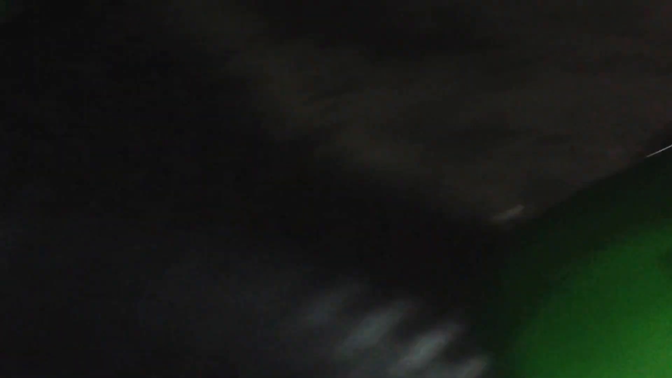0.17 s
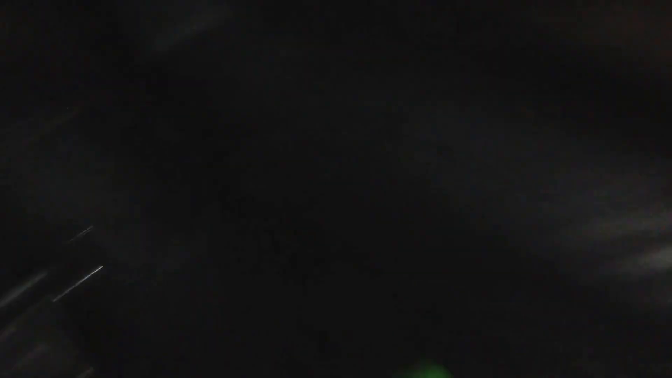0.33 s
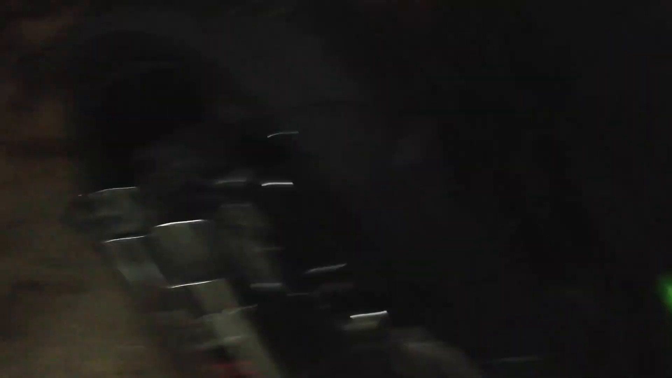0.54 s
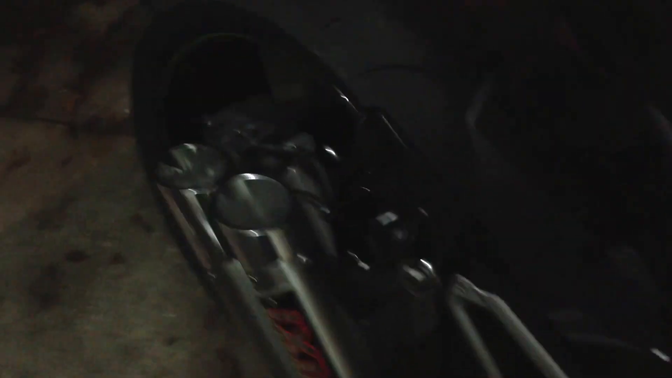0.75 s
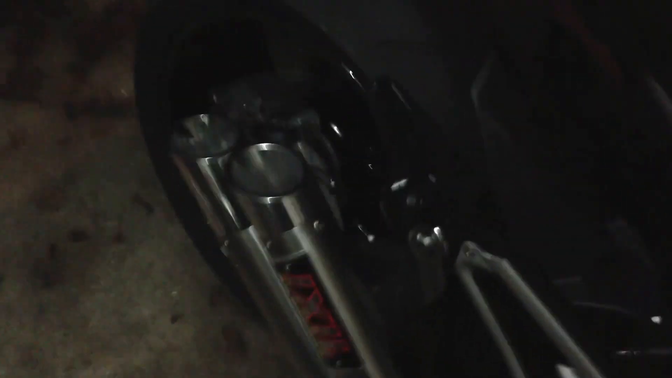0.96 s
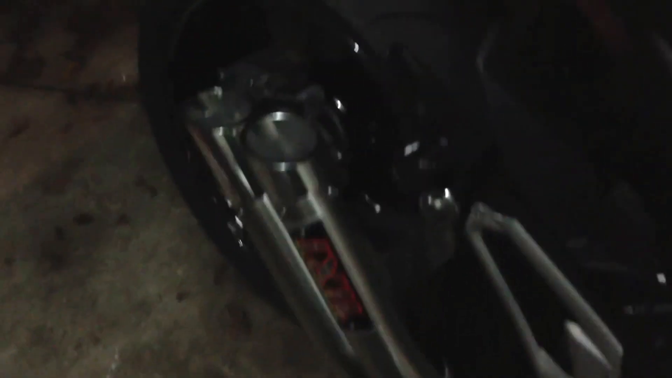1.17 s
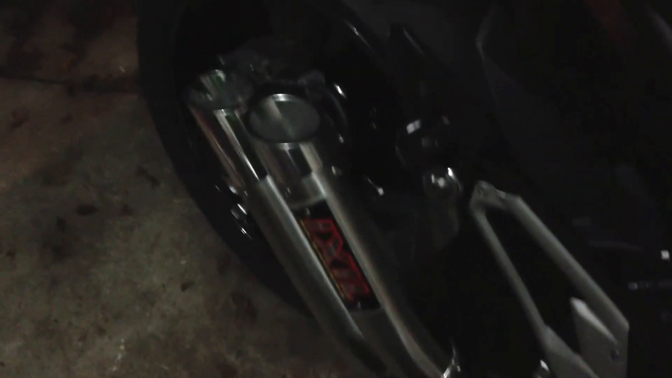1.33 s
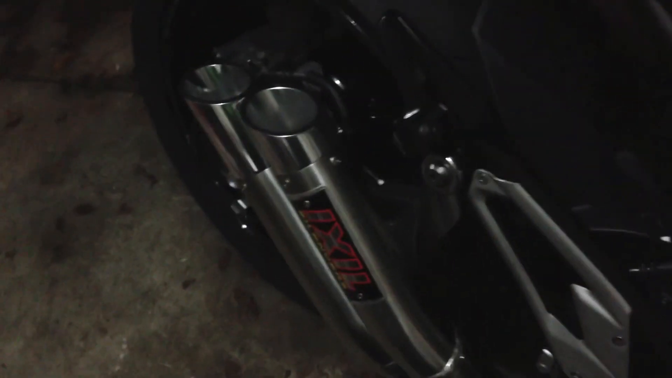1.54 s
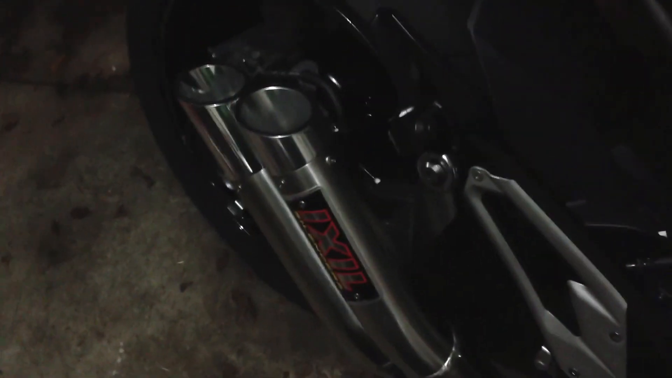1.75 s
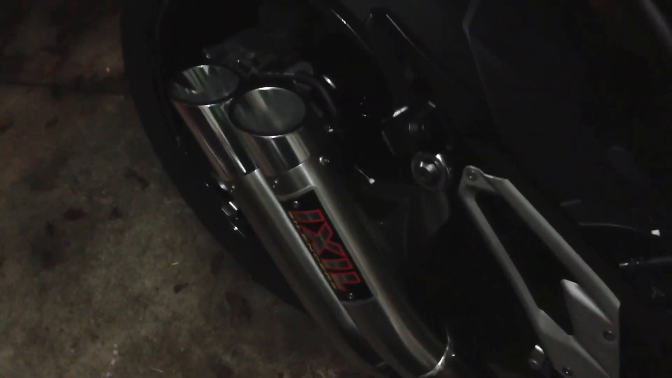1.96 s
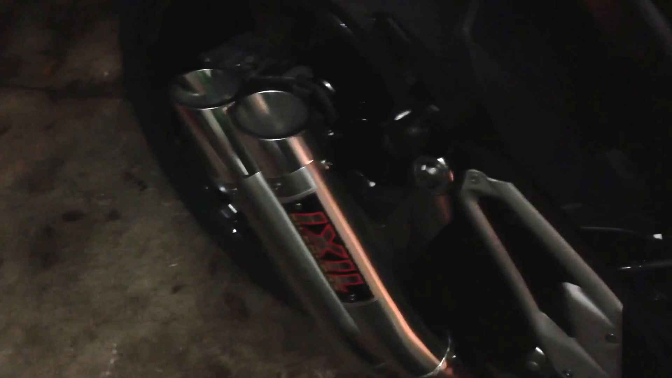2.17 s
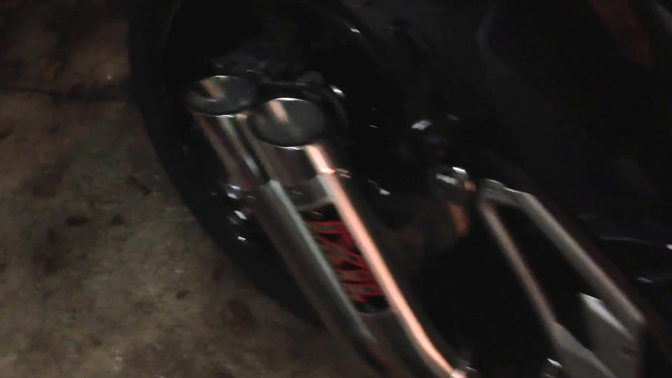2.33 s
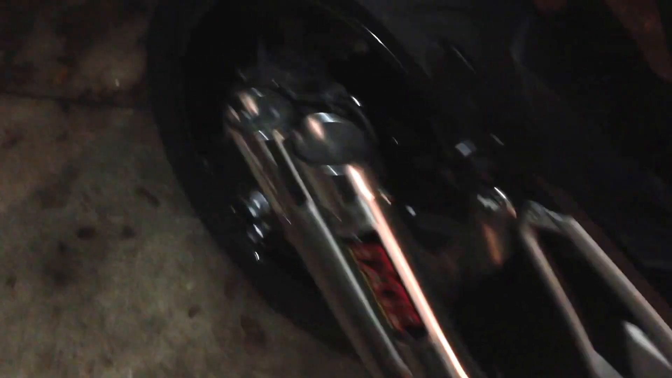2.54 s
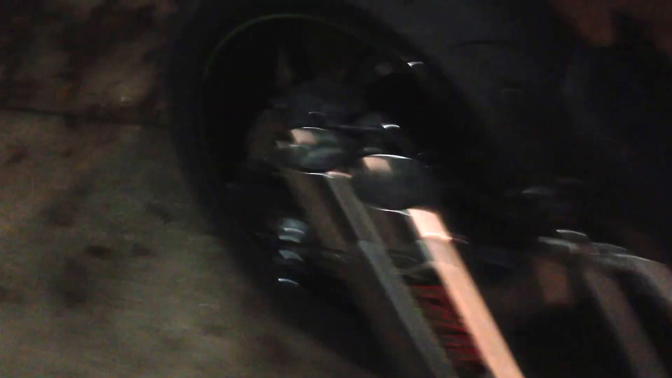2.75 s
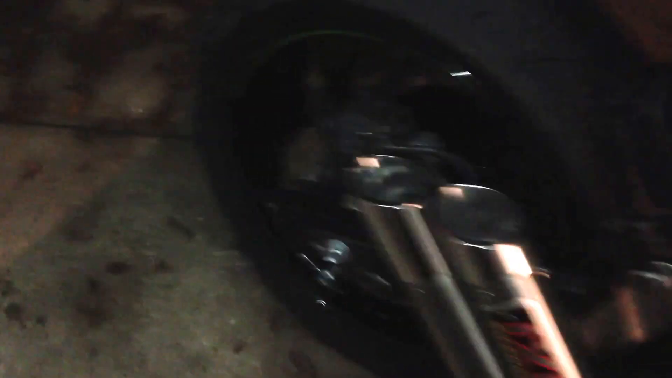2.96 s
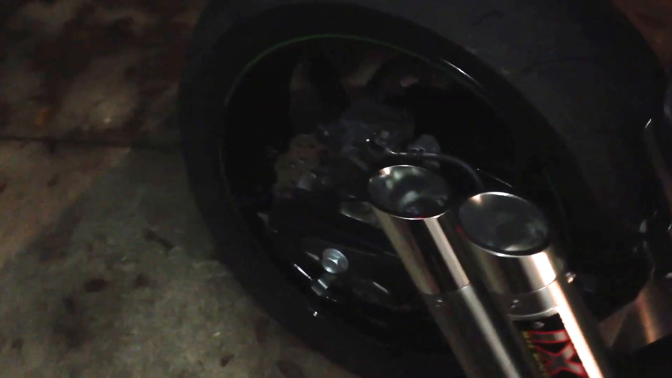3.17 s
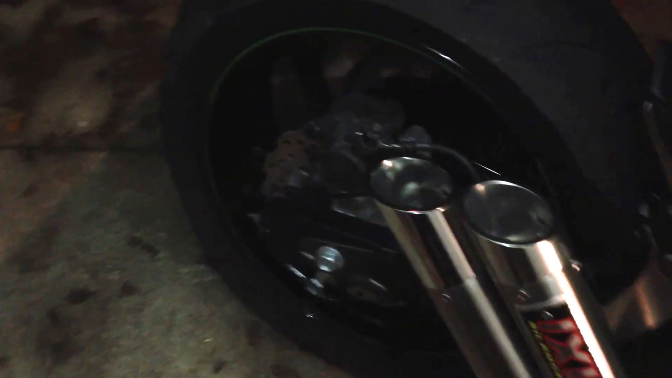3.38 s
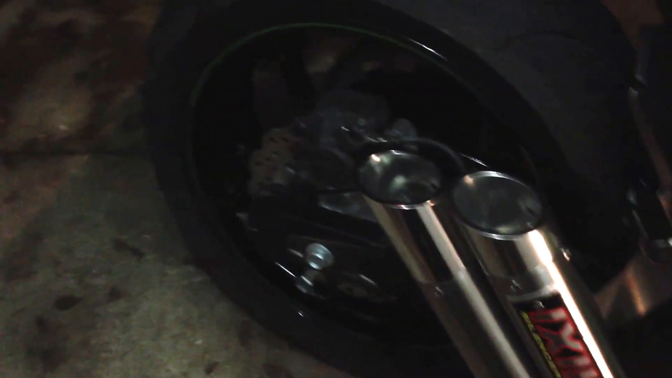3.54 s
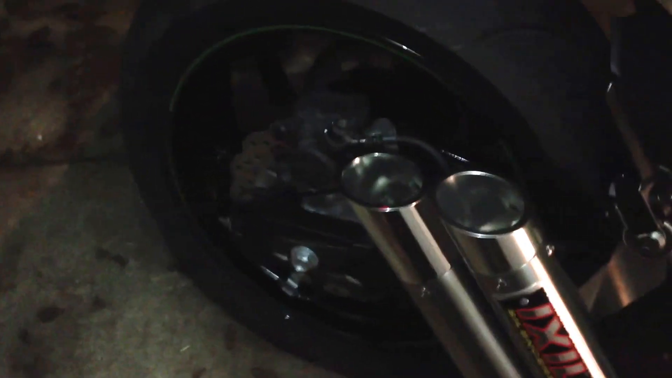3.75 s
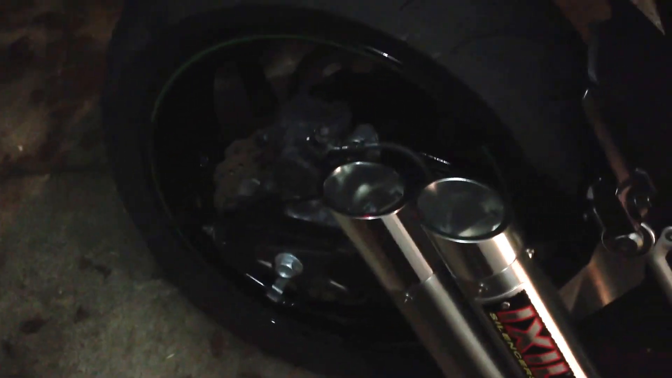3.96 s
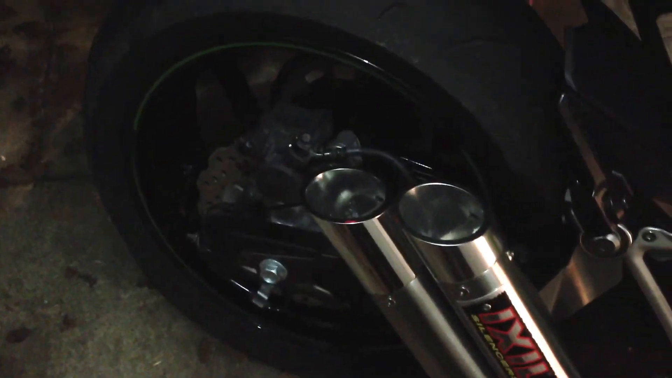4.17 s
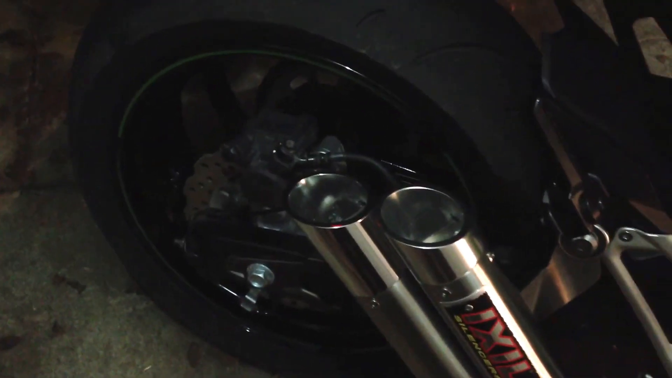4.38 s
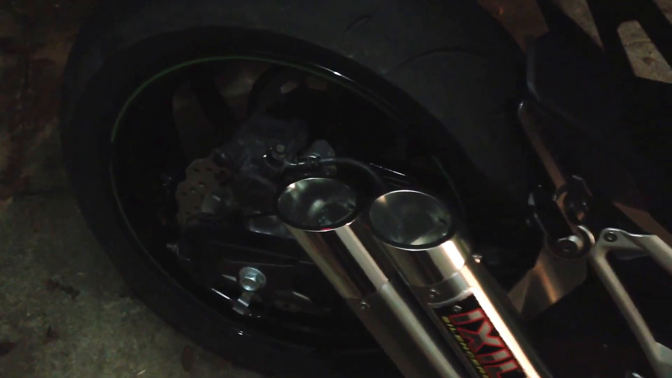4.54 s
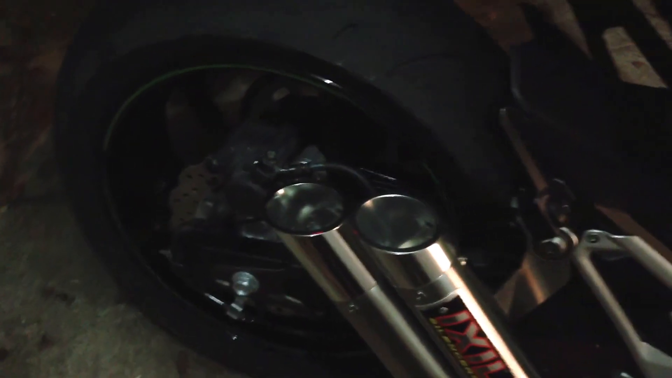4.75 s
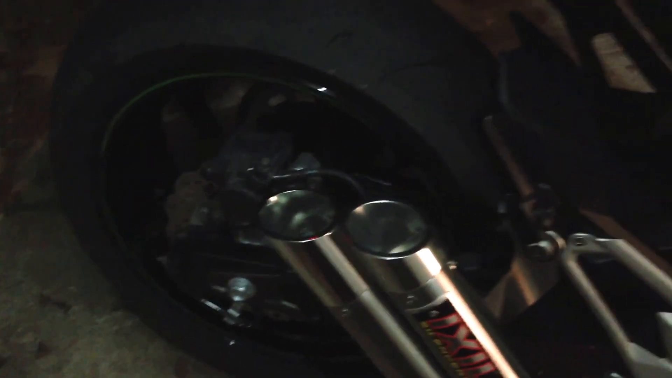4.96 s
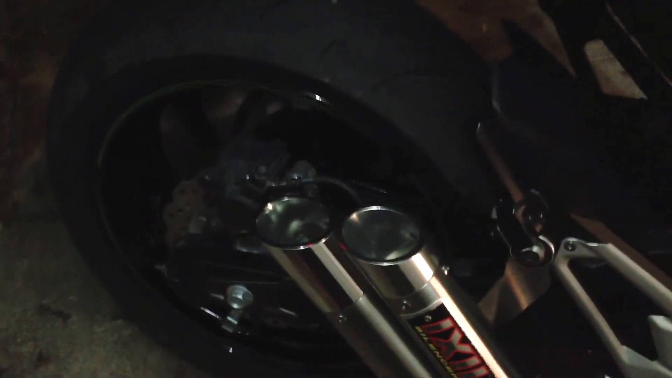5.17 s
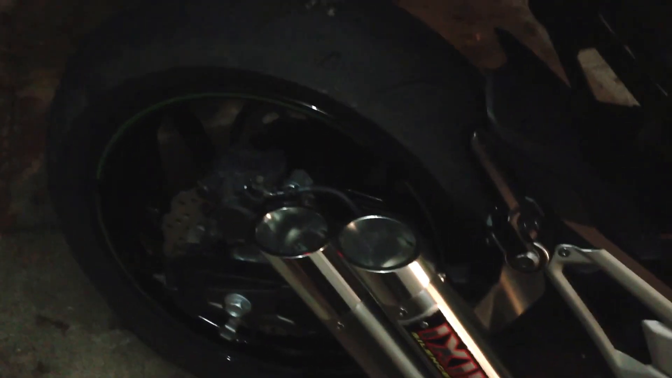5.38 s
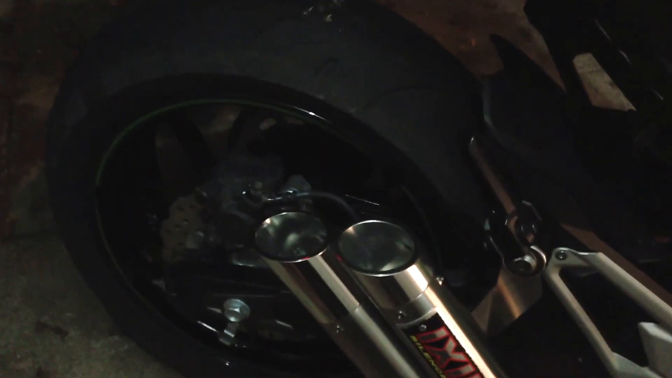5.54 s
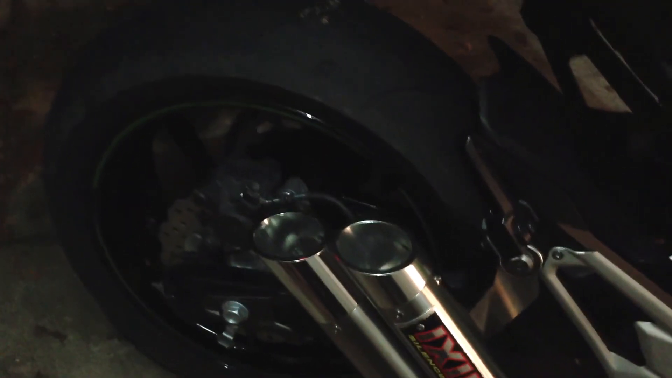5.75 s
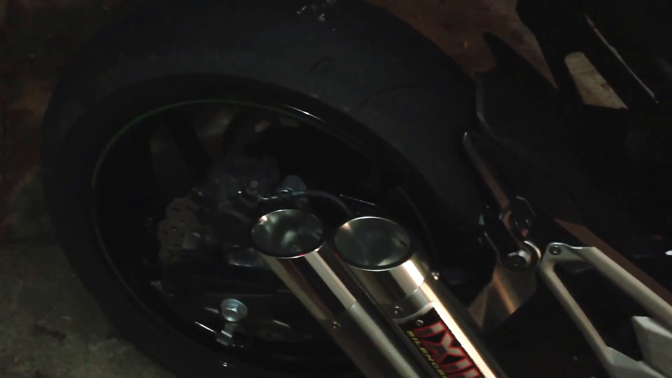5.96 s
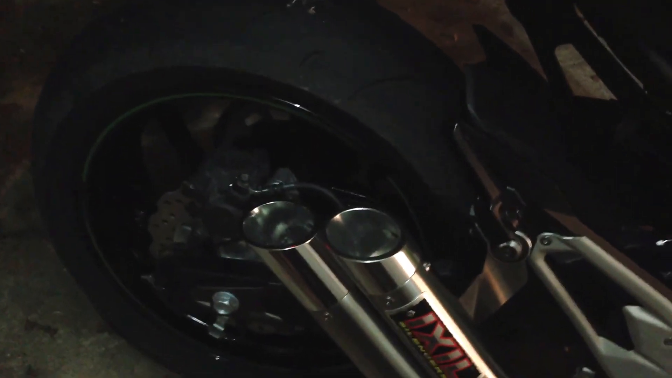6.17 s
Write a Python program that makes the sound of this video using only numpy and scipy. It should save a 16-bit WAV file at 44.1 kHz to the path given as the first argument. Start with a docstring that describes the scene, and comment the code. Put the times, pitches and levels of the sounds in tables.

```python
"""Motorcycle start in a quiet yard

A shoe scuffs twice on concrete: grit noise and snapping grains. A starter clunks in, and its gear teeth
grind and whine through case resonances. A four-cylinder engine catches, stumbles and settles into a slowly
rising idle close to a small microphone: each firing is an impulse that thumps the exhaust pipe, puffs hiss
and cracks, over case clatter, a fluttering rattle, short whistles and gas buffeting the microphone."""
import sys
import numpy as np
from scipy import signal
from scipy.fft import rfft
from scipy.io import wavfile
from scipy.ndimage import uniform_filter1d

SR = 44100
rng = np.random.default_rng(int(sys.argv[2]) if len(sys.argv) > 2 else 0)


def invert_db(level):
    """Linear amplitude ratio for a level in decibels (20 dB per decade), elementwise."""
    return 10 ** (np.asarray(level, dtype=float) / 20)


def materialize(psi):
    """Save the field psi as 16-bit PCM at rate SR to the path in sys.argv[1].

    A 1-D psi becomes a single channel; in a 2-D psi each row is a channel.
    """
    bounded = np.clip(np.atleast_2d(psi).T, -1, 1)
    quanta = np.round(bounded * 32767).astype(np.int16)
    wavfile.write(sys.argv[1], SR, quanta)


N = 273861
T = np.arange(N) / SR

# crank speed before pushes from uneven firings: (time [s], firing rate [Hz])
SPEED_HZ = [(1.9147, 32.75), (1.98, 48.73), (2.06, 40.73), (2.34, 32.76), (2.44, 39.49), (2.62, 37.74),
            (3.1, 41.44), (3.3, 40.54), (4.2, 46.86), (4.7, 46.48), (5.2, 46.87), (5.5, 48.91),
            (6.21, 48.43)]
# weak, missed or unusually strong firings: (time [s], change from usual [dB])
UNEVEN_FIRINGS = [(2.011, -6), (2.059, -12), (2.091, -6), (2.139, -4), (2.225, -16), (2.315, -16),
                  (2.565, -12), (2.78, -3), (3.153, 3), (3.249, 3), (3.344, 4), (3.532, 4), (3.625, 3),
                  (4.093, -5), (4.245, -3), (4.271, -16), (4.444, -11), (5.368, -3), (5.389, -3),
                  (5.53, -10), (5.703, -7), (5.724, -12), (5.873, 3), (5.899, -16), (6.041, 4), (6.061, -7)]
# engine case resonances: (frequency [Hz], width [Hz], level [dB])
CASE_MODES = [(851, 31, -6), (1590, 50, -3), (1890, 88, 0), (2500, 23, -10), (2670, 37, -6), (3010, 50, -7),
              (3220, 55, -4), (3500, 23, -8), (3680, 57, -8), (6550, 70, -17), (7650, 130, -15),
              (7960, 53, -16), (9770, 50, -19), (10600, 74, -25)]
# spectrum of grinding gears, also of case rattles: (frequency [Hz], density [dB per Hz])
GRIND_SPECTRUM = [(40, -65), (88, -44), (150, -1.5), (400, -12.5), (620, -15), (827, -6), (1870, 2.5),
                  (2360, -5), (3280, 0), (5650, -14), (7710, -46), (15500, -44.5)]
# crack of each cylinder in firing order, one barks brighter: (level [dB])
CYLINDER_CRACK_DB = [-8, -6, 0., -9]
# starter gear whine: (time [s], tooth rate [Hz], relative level [dB])
WHINE_TRACK = [(1.56, 1008, -30), (1.635, 1141, -13.5), (1.69, 1039, -12), (1.715, 955, 1.5),
               (1.73, 870, -9.5), (1.75, 846, -4), (1.775, 777, -13), (1.82, 750, -24), (1.84, 1024, -12),
               (1.94, 865, -19.5)]


def evened(x):
    """Scales to rms 1."""
    return x / np.sqrt(np.mean(x ** 2) + 1e-20)


def curve(rows, column=1, outside=-120):
    """A table column as a function of time."""
    rows = np.asarray(rows, float)
    return np.interp(T, rows[:, 0], rows[:, column], outside, outside)


def noise():
    """White noise of rms about 1."""
    return rng.standard_normal(N)


def drift(samples):
    """Slow random wander of rms 1, smoothed over a number of samples."""
    return evened(uniform_filter1d(noise(), size=samples))


def colour(x, points):
    """Minimum-phase filter with the given spectrum, energy 1."""
    hz, db = np.transpose(points)
    bin_hz = abs(np.fft.fftfreq(16384, 1 / SR))
    log_gain = np.log(invert_db(np.interp(np.log(bin_hz + 1), np.log(hz), db)))
    taps = np.fft.ifft(np.exp(np.conj(signal.hilbert(log_gain)))).real[:4096]
    return signal.oaconvolve(x, taps / np.linalg.norm(taps))[:N]


def ring(x, modes):
    """Sum of fixed two-pole resonances."""
    out = np.zeros(N)
    for hz, width_hz, db in modes:
        r = np.exp(-np.pi * width_hz / SR)
        poles = [1, -2 * r * np.cos(2 * np.pi * hz / SR), r * r]
        out += invert_db(db) * signal.lfilter([1 - r * r], poles, x) * hz / SR
    return out


def grains(per_s, spread_db):
    """Random clicks of both signs, a few of them large; rms 1."""
    chance, size, sign = rng.random((N, 3)).T
    height = invert_db(-abs(spread_db) * np.log(size + .01))
    return evened((chance < per_s / SR) * np.sign(sign - .5) * height)


def spikes(rows):
    """One impulse for each event."""
    out = np.zeros(N)
    for s, db in rows:
        out[round(s * SR)] = invert_db(db)
    return out


def fading(x, t60):
    """Exponential tail after each impulse."""
    return signal.lfilter([1], [1, -np.exp(-np.log(1000) / (t60 * SR))], x)


def delayed(x, samples):
    """Pure delay."""
    return np.r_[np.zeros(samples), x[:-samples]]


def stroke(start, hold, db, rise, fall_db_per_s):
    """Gain of an attack, hold and release."""
    return np.clip((T - start) / rise, 0, 1) * invert_db(db - fall_db_per_s * np.maximum(T - start - hold, 0))


def settling(early_db, settled_db):
    """Gain that passes from its early to its settled value as the engine steadies."""
    return invert_db(np.interp(T, (3.1, 3.22), (early_db, settled_db)))


def surplus(t60):
    """Push gained or lost by each uneven firing (-1 = none at all), dying away."""
    pushes = spikes(UNEVEN_FIRINGS)
    return fading(pushes - (pushes > 0), t60)


def crank():
    """Firings counted so far; uneven ones push or drag the speed, which then recovers."""
    push_hz, recover_t60_s = 3.76, .5
    return np.cumsum(curve(SPEED_HZ, outside=0) + push_hz * surplus(recover_t60_s)) / SR


def yard():
    """Far hum of the yard: steady coloured noise."""
    # (frequency [Hz], density [dB per Hz])
    hum_spectrum = [(15, -76), (25, -47.5), (122, -9.5), (160, -1), (281, -13.5), (399, -19), (433, -8.5),
                    (469, -18), (567, -12), (631, -16.5), (1200, -17.5), (15500, -36.5)]
    return invert_db(-56.5) * colour(noise(), hum_spectrum)


def shoe():
    """Grit rolls under a sliding sole and a few grains snap."""
    # (time of peak [s], peak level [dB], rise [dB/s])
    scuffs = [(0.355, -47, 300), (0.556, -27, 921.5)]
    # spectrum of grit on concrete: (frequency [Hz], density [dB per Hz])
    grit = [(60, -74), (300, -25), (800, -15), (1500, -2), (2300, 4.5), (3300, -3.5), (6000, -13),
            (10000, -20.5), (15500, -36)]
    # grit snapping under the sole: (time [s], relative level [dB])
    snap_events = [(0.531, -27), (0.3461, -31), (0.5464, -21), (0.5536, -10), (0.5604, -13), (0.5764, -16),
                   (0.6005, -9), (0.6064, -13)]
    fade_db, fade_s = 23.5, 0.0975  # falls this far in this time, ever faster
    levels_db = []
    for s, db, rise in scuffs:
        levels_db.append(db + np.where(T < s, rise * (T - s), -fade_db * ((T - s) / fade_s) ** 2))
    rub = colour(grains(per_s=5000, spread_db=1.0), grit) * invert_db(np.max(levels_db, axis=0))
    bursts = fading(spikes(snap_events), t60=.008) * noise()
    snaps = colour(bursts, grit[:7] + [(9000, -40)]) * .6
    return rub + snaps


def gear_grind(teeth, flutter_db):
    """Tooth clicks ring the case, louder as the starter heaves against compression."""
    # (start [s], hold [s], relative level [dB])
    heaves = [(1.536, 0.228, -18.5), (1.827, 0.049, -14)]
    rise_s, fall_db_per_s, between_db = 0.006, 322, -24.5
    strokes = [stroke(*row, rise_s, fall_db_per_s) for row in heaves]
    between = invert_db(between_db) * (T > heaves[0][0]) * (T < heaves[-1][0])
    load = 1.31 * np.max(strokes + [between], axis=0)
    grind = 0.5 * evened(ring(teeth, CASE_MODES[:11])) + 0.41 * colour(teeth, GRIND_SPECTRUM)
    # the grind turns bright when the gears spin fastest
    excess_hz = np.maximum(curve(WHINE_TRACK, outside=900) - 1046, 0)
    fizz = invert_db(-17.5 + 0.0749 * excess_hz)
    fizz = fizz * colour(teeth, [(4500, -28), (6500, 5.5), (9000, 6.5), (15300, -15.0)])
    return load * (invert_db(0.58 * flutter_db) * grind + fizz)


def gear_whine(flutter_db):
    """Tooth-rate harmonics, each lighting up while it slides across a case resonance."""
    # harmonics of the tooth rate, from the first: (level [dB])
    harmonics_db = [-4.5, 0.5, -2.5, -5, -14.5, 11, -6, 0, 4, -6, -10]
    wobble = 1 + .022 * drift(250)
    turns = np.cumsum(curve(WHINE_TRACK, outside=900) * wobble) / SR
    load = invert_db(curve(WHINE_TRACK, column=2) + flutter_db)
    lines = [invert_db(db) * np.sin(2 * np.pi * (k + 1) * turns) for k, db in enumerate(harmonics_db)]
    wide_modes = [(hz, 1.9 * width_hz, db / 2) for hz, width_hz, db in CASE_MODES]
    return 0.24 * load * sum(lines[:5]) + 0.97 * ring(load * sum(lines), wide_modes)


def pinion_clunks():
    """The pinion clunks as it takes up the load: short coloured noise bursts."""
    # (time [s], relative level [dB])
    clunks = [(1.538, -3), (1.831, -7)]
    body = colour(noise(), [(50, -50), (300, -17), (1500, -6), (4000, 2), (15000, -17.5)])
    return fading(spikes(clunks), t60=0.036) * body * 0.36


def freewheel(teeth):
    """Starter clutch freewheeling: clicks through its resonances, running down after a hold."""
    # (frequency [Hz], width [Hz], level [dB])
    clutch_modes = [(1640, 220, 9), (2170, 100, 16.5), (2620, 120, 13), (3100, 180, 6), (3820, 96, 11.5),
                    (4670, 60, 6), (7700, 200, -14)]
    start_s, end_s, swell_s = 2, 2.5, 0.07
    rasp = colour(teeth, [(1500, -1.5), (4000, 0.5), (6500, -9), (9500, -3.5), (15300, -18)])
    spin = .5 * evened(ring(teeth, clutch_modes)) + 0.18 * rasp
    gain = stroke(start_s - swell_s, end_s - start_s + swell_s, -27, 2 * swell_s, fall_db_per_s=97.5)
    return spin * gain * (T > start_s)  # enters halfway up the swell


def starter():
    """Grind, whine, clunks and freewheel, kept free of deep bass."""
    teeth = grains(per_s=2500, spread_db=3.0)
    flutter_db = 3.0 * drift(250)
    total = gear_grind(teeth, flutter_db) + gear_whine(flutter_db) + pinion_clunks() + freewheel(teeth)
    housing = signal.butter(4, 110, "highpass", fs=SR, output="sos")
    return signal.sosfilt(housing, total)


def firings():
    """Four impulse trains of the cylinders: strength, sharpness, stray echo, crack."""
    # usual strength of each cylinder in firing order: (level [dB])
    cylinders_db = [-1.5, -1.2, 0., -3.9]
    jitter_s = .0002
    turns = crank()
    at = np.searchsorted(turns, np.arange(int(turns[-1]) + 1) + 1e-6)
    db = np.resize(cylinders_db, len(at))
    for s, change_db in UNEVEN_FIRINGS:
        db[np.argmin(abs(at / SR - s))] += max(change_db, -9.5)  # a missed firing still pumps gas
    luck = np.clip(rng.standard_normal((len(at), 4)), -2, 2)
    at = at + np.round(jitter_s * SR * luck[:, 3]).astype(int)
    bright = invert_db(np.resize(CYLINDER_CRACK_DB, len(at)))
    strength = invert_db(db + .65 * luck[:, 0])
    trains = np.zeros((4, N))
    trains[:, at - 110] = strength * np.c_[np.ones(len(at)), luck[:, 1:3], bright].T  # 2.5 ms early
    return trains


def exhaust(trains):
    """Thump of the pipe; each firing is a little sharper or duller, with its own reflections."""
    # pipe and microphone answering one firing: (frequency [Hz], level [dB])
    pipe = [(60, -34.5), (112, -21.5), (140, 1), (185, 3.5), (228, 7), (258, -7), (290, -6.5), (350, -9.5),
            (415, -12.5), (470, -34.5), (560, -37.5), (700, -33), (1000, -48), (2000, -79)]
    # band that comes back from the far end of the pipe: (frequency [Hz], level [dB])
    return_band = [(150, -23.5), (250, -8.5), (300, 1.5), (420, -3), (480, -36), (1000, -20)]
    # unfired strokes pumped down the pipe while cranking: (time [s], level against a firing [dB])
    unfired_puffs = [(1.728, -23), (1.852, -24)]
    thump_db, upper_hz, upper_share = -1, (265, 460), .5
    fire, sharp, late, bright = trains
    impulse = spikes([(0, 0)])
    shape = fire + 3 * np.gradient(sharp) + .2 * delayed(late, 400)
    back = delayed(fire, 774)  # 17.5 ms down the pipe and back
    return_peak = abs(rfft(colour(impulse, return_band)[:4096])).max()
    shape += invert_db(-10.5) * colour(back, return_band) / return_peak
    # the upper body of the thump follows each cylinder's brightness
    upper = signal.butter(2, upper_hz, "bandpass", fs=SR, output="sos")
    relative_bright = bright / invert_db(np.array(CYLINDER_CRACK_DB)).mean()
    shape += upper_share * signal.sosfiltfilt(upper, relative_bright - fire)
    shape += spikes(unfired_puffs)
    thump = -invert_db(thump_db) * colour(shape, pipe) / abs(colour(impulse, pipe)).max()
    # loose rumble of gas in the pipe
    churn = colour(noise(), pipe) * fading(fire, t60=.35) * settling(early_db=-23.5, settled_db=-28)
    return thump + churn


def gas_hiss(fire):
    """Dense grains of gas noise, swelling with each firing."""
    # (frequency [Hz], density [dB per Hz])
    hiss = [(260, -18), (450, 3.5), (553, 0), (605, -35.5), (681, -2), (801, -18.5), (901, -2),
            (1320, -9.5), (1810, -2.5), (2540, -14.5), (3730, -11), (13500, -32), (15400, -34)]
    puff = fading(uniform_filter1d(fire, size=120), t60=0.22)
    return colour(grains(per_s=8100, spread_db=1.0), hiss) * (.5 + evened(puff) * 0.35)


def firing_crack(bright):
    """Noise burst and filtered impulse at the front of each firing, stronger on bright cylinders."""
    # noise burst: (frequency [Hz], density [dB per Hz])
    crack_spectrum = [(350, -33), (560, 10), (680, -6), (900, -10), (1400, -13.5), (4500, -17.5),
                      (8000, -22), (15300, -32)]
    # upper edge of the thump: (frequency [Hz], level [dB])
    bark = [(300, -45), (480, -14), (570, 0), (690, 0), (800, -14), (1500, -40)]
    front = fading(signal.lfilter(np.ones(240), 1, bright), t60=.045)
    burst = colour(noise(), crack_spectrum) * evened(front) * invert_db(-9.0)
    return burst + evened(colour(bright, bark)) * invert_db(-11.0)


def case_rattles():
    """Sharp rattles in the case while idling: decaying noise bursts."""
    # (time [s], relative level [dB])
    rattles = [(2.3153, -32), (2.39, -18.5), (2.4774, -22.5), (2.7212, -20), (2.827, -21), (3.01, -31),
               (3.5006, -28.5), (4.206, -38), (5.092, -37)]
    return fading(spikes(rattles), t60=0.19) * colour(noise(), GRIND_SPECTRUM) * 0.46


def flutter_rattle():
    """Sparse clicks ring three resonances, from the 20th firing on."""
    # (frequency [Hz], width [Hz], level [dB])
    flutter_modes = [(1956, 140, 0), (1490, 200, -4), (980, 52, -12)]
    clicks = grains(per_s=400, spread_db=3.0)
    return evened(ring(clicks, flutter_modes)) * settling(early_db=-36, settled_db=-50) * (crank() > 20)


def gas_buffet():
    """Exhaust gas buffets the microphone: lumpy low noise."""
    # (time [s], level [dB])
    buffet_level = [(1.9, -37), (2.5, -42), (3.2, -44), (4.2, -34), (6.3, -32.5)]
    lumps = invert_db(6.5 * drift(2000))
    low = colour(noise(), [(15, -33.0), (40, -4), (70, 4.5), (110, 8.5), (200, -48), (500, -93)])
    return invert_db(curve(buffet_level)) * low * evened(lumps)


def running(fire, bright):
    """Hiss, crack and valve clatter dip after a weak firing and lift after a strong one."""
    # common gain of hiss, crack and clatter: (time [s], level [dB])
    running_level = [(1.94, -29.5), (2.4, -30.5), (2.9, -33), (3.7, -34), (4.2, -31.5), (6.21, -31)]
    miss_dip_db, miss_dip_t60_s = 3.5, 0.2
    clatter = evened(ring(grains(per_s=2500, spread_db=2.0), CASE_MODES)) * invert_db(-11.0)
    gain = invert_db(curve(running_level) + miss_dip_db * surplus(miss_dip_t60_s))
    engine = gain * (gas_hiss(fire) + firing_crack(bright) + clatter)
    return engine + case_rattles() + flutter_rattle() + gas_buffet()


def whistle():
    """A brief tone swells just after the first cylinder fires, once every four firings."""
    order = 23.3  # multiple of the firing rate
    gate = np.exp(-((crank() % 4 - .55) / .45) ** 2) * (crank() > 4)
    waver = 1 + .02 * drift(900)
    cycles = np.cumsum(order * curve(SPEED_HZ, outside=0) * waver) / SR
    return settling(early_db=-31, settled_db=-40.5) * gate * np.sin(2 * np.pi * cycles)


def scene():
    """All sources over the far hum of the yard."""
    trains = firings()
    engine = exhaust(trains) + running(trains[0], trains[3]) + whistle()
    return (yard() + shoe() + starter() + engine)[None]


def low_pass(x):
    """Removes everything above the highest recorded frequency."""
    return signal.sosfilt(signal.butter(12, 16090, fs=SR, output="sos"), x)


def record(dry):
    """The input stage rounds off the tallest thumps, then a low-pass limits the band."""
    over = np.maximum(abs(dry) - .7, 0)
    rounded = dry - np.sign(dry) * (over - .27 * np.tanh(over / .27))
    limited = signal.oaconvolve(rounded, signal.firwin(255, 15700, fs=SR)[None], "same")
    return low_pass(limited)


dry = scene()
out = record(dry)
materialize(out)
```